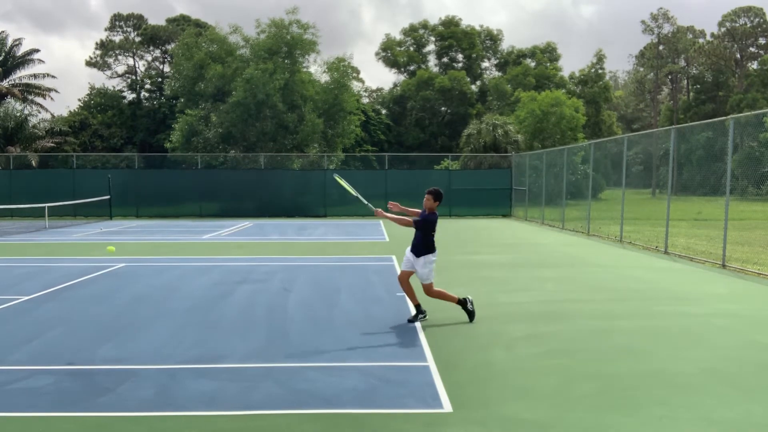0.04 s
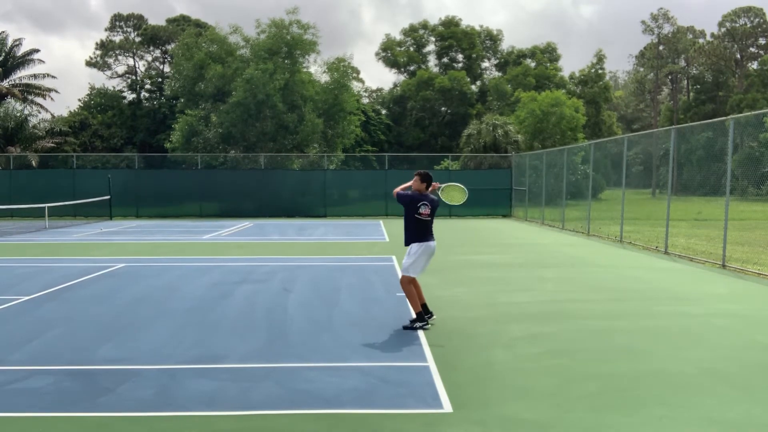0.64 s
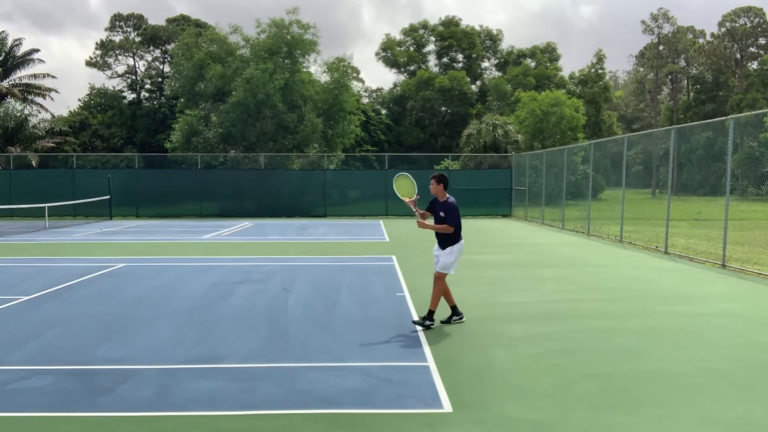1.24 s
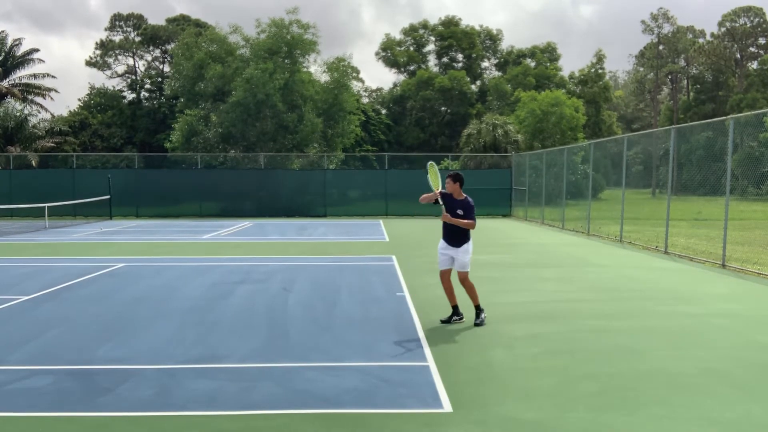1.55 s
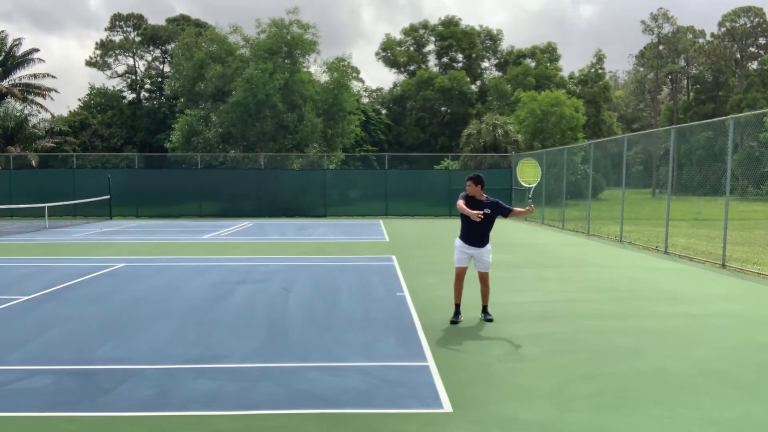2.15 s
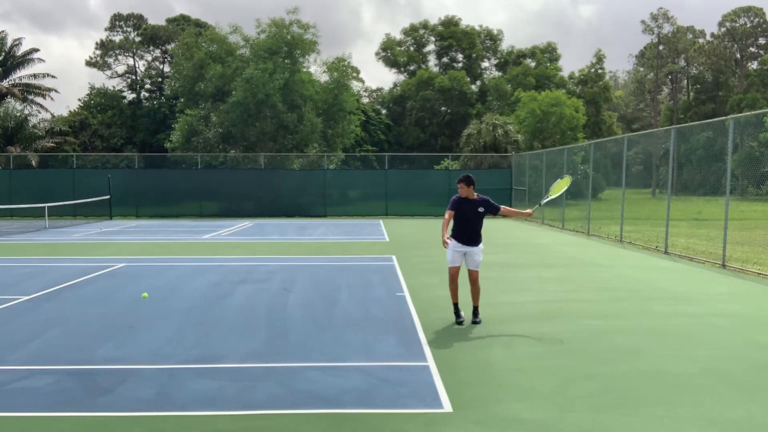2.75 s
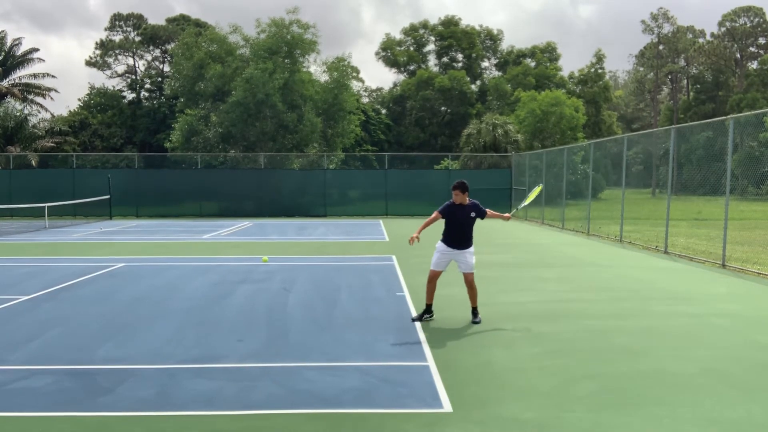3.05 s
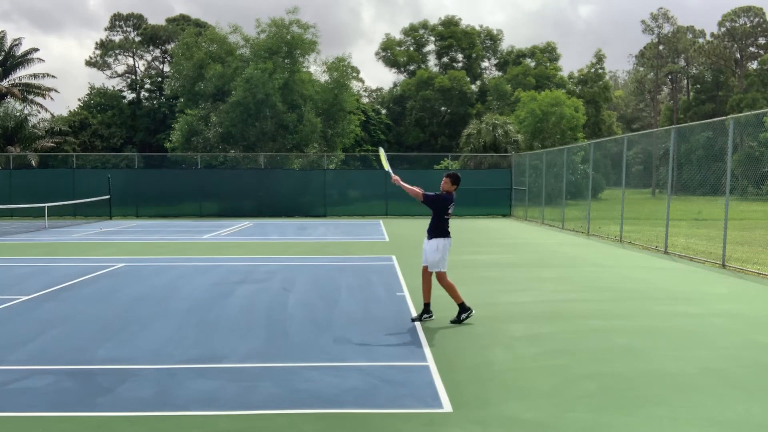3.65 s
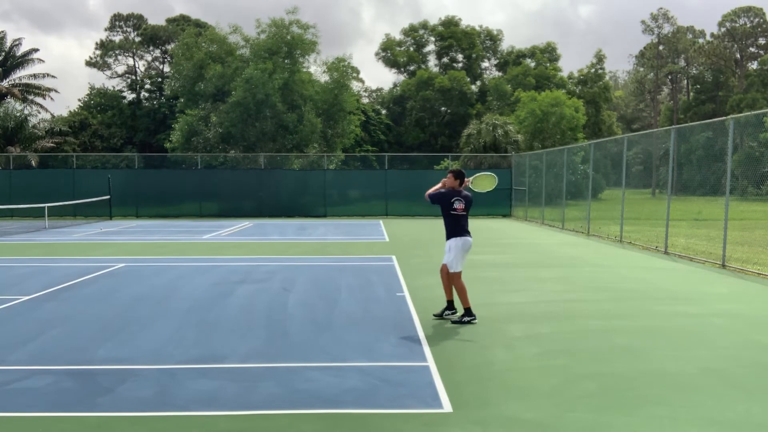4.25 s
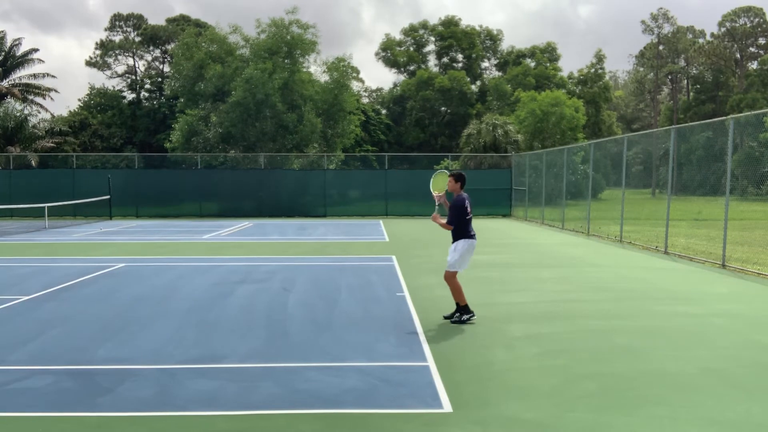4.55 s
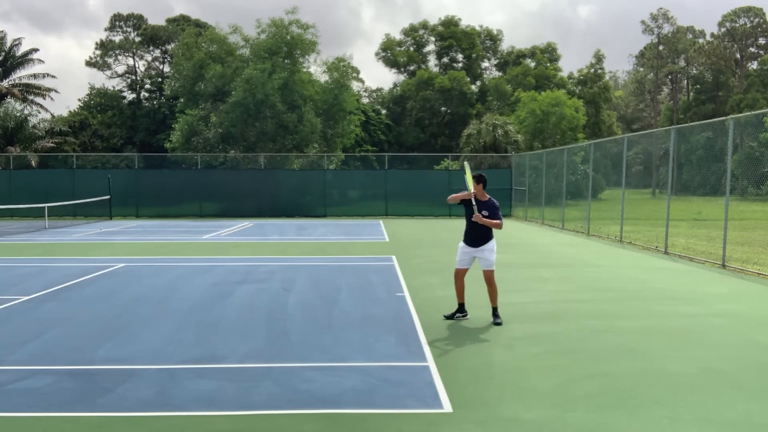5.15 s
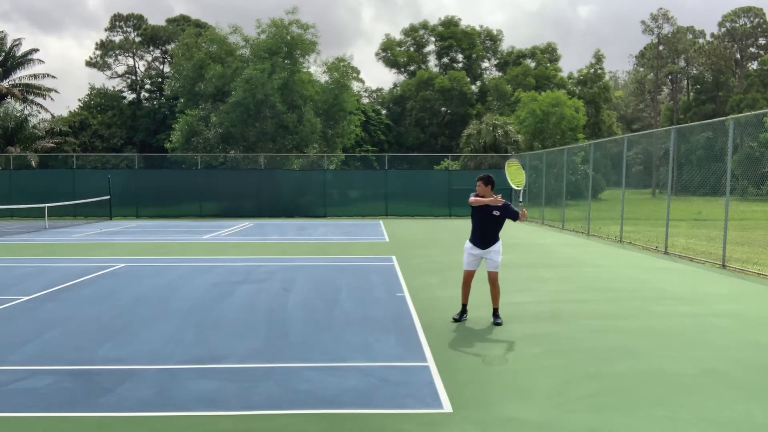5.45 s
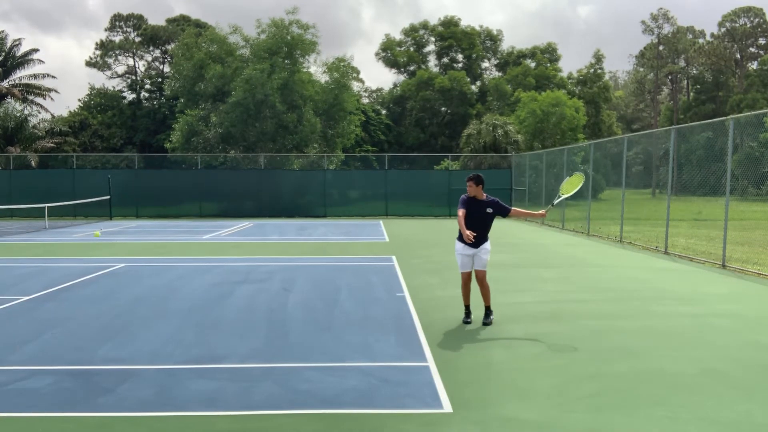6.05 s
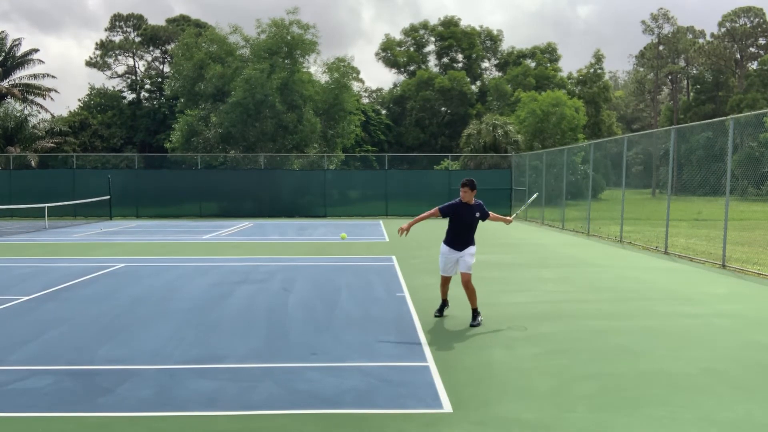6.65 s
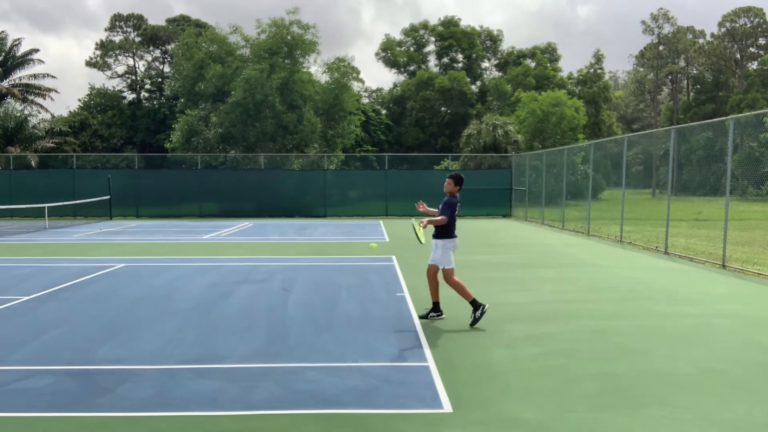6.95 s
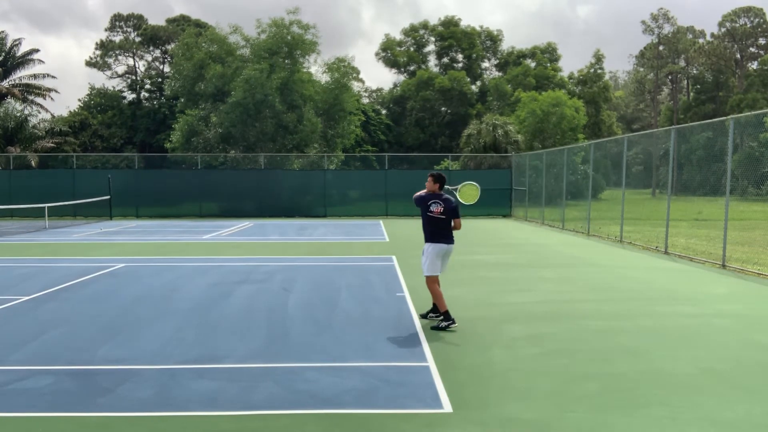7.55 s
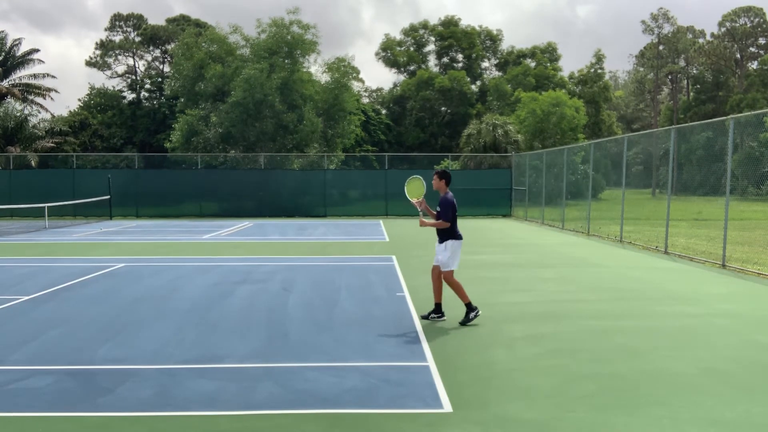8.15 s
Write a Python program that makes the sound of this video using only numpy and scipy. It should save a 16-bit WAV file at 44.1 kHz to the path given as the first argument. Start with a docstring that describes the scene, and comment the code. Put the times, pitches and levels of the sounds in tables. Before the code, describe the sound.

Two tennis strokes ring out on an open court, each a hollow pock preceded by a softer bounce. The first ends in a knock and chinking wire fence, the second in a loud smack against the net, both slightly left of the microphone. Rubber soles squeak, scrape and tap between shots. Far hollow ticks, low traffic, light rustling and a little birdsong fill the quiet background.

```python
"""A tennis racket hits two forehands on an outdoor hard court, each with the hollow pock of a squeezed ball.
Each ball bounces before the stroke; afterwards one rattles the wire fence and the other smacks the net.
Shoes tap the court, scrape over grit and squeak as their rubber sticks and slips. Fences and trees echo.
Behind it all are hollow ticks, far traffic, a thin high hiss, light rustling and one bird."""
import sys
import numpy as np
from scipy import signal
from scipy.fft import rfft, irfft, next_fast_len
from scipy.io import wavfile
from scipy.ndimage import uniform_filter1d

SR = 44100
rng = np.random.default_rng(int(sys.argv[2]) if len(sys.argv) > 2 else 0)


def put_to_file(sound):
    """Save the sound as 16-bit audio at rate SR, in the file named by the first command-line argument."""
    columns = np.atleast_2d(sound).T  # one column per channel
    safe = np.clip(columns, -1, 1)
    whole_steps = np.round(safe * 32767)
    wavfile.write(sys.argv[1], SR, whole_steps.astype(np.int16))


N = 366471
T = np.arange(N) / SR  # seconds since the scene began
EVENT_T = np.arange(-SR // 4, SR // 4) / SR  # seconds before and after one short event

# tone of a hard knock, from a ball or a shoe: pitch_hz, level_db
KNOCK_TONE = [(150, -30), (600, -7), (1200, 15.5), (2200, 6.5), (3100, 8), (4500, 3), (7000, -5),
              (11000, -46), (16000, -24)]


def from_db(db):
    """Turn decibels into a number to multiply by."""
    return 10 ** (np.asarray(db) / 20)


def unit_power(x):
    """Scale a signal so that its average power is one."""
    return x / np.sqrt(np.mean(x ** 2) + 1e-20)


def over_time(rows):
    """Join (time, value) points with straight lines, giving a value for every sample."""
    times, values = np.transpose(rows)
    return np.interp(T, times, values)


def over_pitch(rows, size):
    """Spread a table's columns over every frequency in a spectrum of `size` samples."""
    hz, *columns = np.transpose(rows)
    log_hz = np.log(np.fft.rfftfreq(size, 1 / SR) + 1)
    return [np.interp(log_hz, np.log(hz), column) for column in columns]


def shape_tone(x, tone):
    """Make each pitch louder or softer, as a table of (pitch_hz, level_db) says."""
    size = 2 * next_fast_len(x.shape[-1] // 2 + 1)
    cepstrum = irfft(np.log(from_db(over_pitch(tone, size)[0])))
    # folding onto the first half makes the filter ring after a sound, not before it
    cepstrum[1:size // 2] *= 2
    cepstrum[size // 2 + 1:] = 0
    return irfft(rfft(x, size) * np.exp(rfft(cepstrum)))[..., :x.shape[-1]]


def noise():
    """White noise for one event."""
    return rng.standard_normal(len(EVENT_T))


def noise_band(hz, width_hz):
    """Noise gathered around one pitch."""
    edges_hz = [max(hz - width_hz / 2, 20), min(hz + width_hz / 2, SR / 2 - 20)]
    band = signal.butter(1, edges_hz, "band", fs=SR, output="sos")
    return unit_power(signal.sosfilt(band, signal.sosfilt(band, noise())))


def wobble(samples):
    """A smooth random wander for one event; more samples make it slower."""
    return unit_power(uniform_filter1d(uniform_filter1d(noise(), samples), samples))


def flicker(length, depth_db, samples):
    """A gain that flickers at random; more samples make it slower."""
    return from_db(depth_db * unit_power(uniform_filter1d(rng.standard_normal(length), samples)))


def swell(rise_s, fall_s, peak_s=0):
    """A rounded rise to a peak, then a fade."""
    t = EVENT_T - peak_s
    return np.exp(-np.where(t < 0, (t / rise_s) ** 2, np.hypot(t / fall_s, .5) - .5))


def ring(hz, ring_s):
    """One note of a struck object, fading by 60 dB in ring_s seconds."""
    t = np.maximum(EVENT_T, 0)
    return np.sin(2 * np.pi * hz * t) * from_db(-60 * t / ring_s)


def click(scatter_db, fall_s):
    """One sharp contact and the scatter of noise that follows it."""
    return (EVENT_T == 0) + from_db(scatter_db) * noise() * swell(.0001, fall_s) * (EVENT_T > 0)


def place(out, sound, at_s, left_late_ms, left_louder_db):
    """Add an event to the scene, with a small gap in time and level between left and right."""
    start = round((at_s + EVENT_T[0]) * SR)
    low, high = max(start, 0), min(start + len(EVENT_T), N)
    for channel, sign in enumerate((1, -1)):
        delayed = np.roll(sound, round(max(sign * left_late_ms, 0) * SR / 1000))
        out[channel, low:high] += from_db(sign * left_louder_db / 2) * delayed[low - start:high - start]


def wide_noise(tone):
    """Steady stereo noise, partly shared by left and right and partly separate."""
    # how the two sides compare: pitch_hz, likeness (0 to 1), left_lead_radians, left_louder_db
    sides = [(90, .92, -.2, 1.6), (200, .87, -.35, 1.4), (600, .82, -2.3, -3), (950, .78, -2.8, -3),
             (1500, .4, -3.9, -1), (4200, .55, -9.3, 0), (6500, .45, -10.2, 0), (8200, .96, -9.75, 0),
             (8800, .998, -9.5, 0), (9400, .998, -9.35, 0), (11500, .93, -7.7, 0), (12500, .98, -6.3, 0)]
    size = 2 * next_fast_len(N // 2 + 1)
    likeness, lead, left_louder_db = over_pitch(sides, size)
    spectra = rfft(rng.standard_normal((3, size)))
    left, right = np.sqrt(likeness) * spectra[0] + np.sqrt(1 - likeness) * spectra[1:]
    left = left * from_db(left_louder_db / 2) * np.exp(1j * lead)
    right = right * from_db(-left_louder_db / 2)
    gain = from_db(over_pitch(tone, size)[0])
    return irfft(np.array([left, right]) * gain)[:, :N] * np.sqrt(SR / 2)


def high_hiss():
    """A thin high hiss that slowly swells and sinks."""
    # tone of the hiss: pitch_hz, level_db (per Hz)
    tone = [(3000, -125), (5500, -107), (6600, -99), (7700, -84), (9000, -82), (10000, -78.5),
            (11500, -83.5), (13000, -92.5), (15500, -106)]
    # its slow swell, counted from the middle level: time_s, level_db
    swell_points = [(0.0, -51), (0.74, -53), (1.66, -49.5), (1.94, -50), (2.66, -49.5), (3.19, -50.5),
                    (4.02, -49), (4.44, -52), (5.41, -50.5), (6.08, -49.5), (6.47, -51), (8.3, -51)]
    swell_db = over_time(swell_points)
    return from_db(swell_db - np.median(swell_db)) * wide_noise(tone)


def engine(nearest_s, db, hz, passing_s, waver_db=3.0, share_of_sound_speed=.03):
    """A far engine passes: louder when near, sinking in pitch, wavering on its way through the air."""
    along_road = (T - nearest_s) / passing_s
    distance = np.hypot(1, along_road)
    pitch_hz = hz * (1 - share_of_sound_speed * along_road / distance)
    waver_times = np.arange(0, T[-1] + 1, 0.1)
    waver = np.interp(T, waver_times, rng.standard_normal(len(waver_times)))
    hum = np.sqrt(2) * np.sin(2 * np.pi * np.cumsum(pitch_hz) / SR)
    return from_db(db + waver_db * waver) / distance * hum


def traffic():
    """A far road rumbles steadily while two engines pass, a little louder on the left."""
    # tone of the road: pitch_hz, level_db (per Hz)
    rumble = [(20, -77), (32, -88), (50, -63), (80, -59.5), (125, -61), (175, -67), (310, -75),
              (500, -71.5), (730, -68), (1000, -74.5), (1400, -88), (2000, -94.5), (4000, -104),
              (16000, -118)]
    # passing engines: nearest_s, level_db, pitch_hz, passing_s
    vehicles = [(3.899, -41.5, 103.4, 2.136), (6.3, -46, 78.56, 0.795)]
    engines = sum(engine(*vehicle) for vehicle in vehicles)
    return wide_noise(rumble) + engines * from_db([[.8], [-.8]])


def rustle(level_db):
    """A crinkly wash of many tiny contacts."""
    # tone of the contacts: pitch_hz, level_db
    tone = [(300, -3), (1200, 12), (2200, 0.5), (3500, -2.5), (6000, -5), (10000, -2), (16000, -33)]
    crinkle = flicker(N, depth_db=1.0, samples=150)
    return from_db(level_db) * unit_power(crinkle * wide_noise(tone))


def light_rustling(opening_db=-46, opening_fall_s=0.21):
    """A wash of sound from a stroke just before dies away at the start; a lighter rustle grows through the
    second half."""
    # strength of the lighter rustle: time_s, level_db
    levels = [(3.5, -70), (5.0, -62), (7.5, -57), (8.3, -62)]
    return rustle(over_time(levels)) + rustle(opening_db) * np.exp(-T / opening_fall_s)


def bird(trill_hz=35, trill_db=4.0):
    """A far bird in the trees gives a thin trill and short notes."""
    # its notes: peak_s, level_db, pitch_hz, width_hz, rise_s, fall_s
    notes = [(1.78, -60.5, 5420, 560, 0.025, 0.06), (1.89, -62, 5420, 560, 0.04, 0.07),
             (1.86, -66, 4720, 200, 0.06, 0.08), (1.797, -61, 2810, 160, 0.016, .013),
             (6.465, -62, 2900, 220, 0.025, .03)]
    out = np.zeros((2, N))
    trill = from_db(trill_db * np.sin(2 * np.pi * trill_hz * EVENT_T))
    for peak_s, db, hz, width_hz, rise_s, fall_s in notes:
        note = from_db(db) * noise_band(hz, width_hz) * trill * swell(rise_s, fall_s)
        place(out, note, peak_s, left_late_ms=0.38, left_louder_db=5.0)
    return out


def far_ticks():
    """Hollow ticks, each with its own pitch, come from the left, like a ball bouncing on the far court."""
    # ticks: start_s, peak_db, pitch_hz, width_hz, scatter_db
    ticks = [(1.236, -35.5, 2580, 2000, -34), (4.4998, -34, 4120, 700, -26),
             (4.5297, -41, 3300, 1800, -18.5), (4.6137, -26, 2290, 950, -31),
             (4.9513, -45, 3030, 1800, -13), (5.0732, -37, 2920, 1700, -35), (5.371, -27, 2710, 1410, -38),
             (5.47, -46, 2520, 700, -30), (5.619, -37.5, 2510, 1400, -30), (5.722, -43.5, 2580, 900, -31)]
    out = np.zeros((2, N))
    for start_s, db, hz, width_hz, scatter_db in ticks:
        body = signal.butter(3, [hz - width_hz / 2, hz + width_hz / 2], "band", fs=SR, output="sos")
        contact = click(scatter_db, fall_s=0.0097) + 1e-18  # the tiny offset keeps the filter fast
        tick = signal.sosfilt(body, contact)
        place(out, from_db(db) * tick / abs(tick).max(), start_s, left_late_ms=-0.36, left_louder_db=4.5)
    return out


def court_echo(sound, tail_db=-22, ring_s=0.58, build_s=.008):
    """A few clear echoes, and a thin tail scattered unevenly by posts and branches."""
    # echoes from the fence and windscreens: delay_s, level_db
    echoes = [(0.0102, -19), (0.0198, -32), (0.049, -74), (0.089, -67)]
    # tone of the tail: pitch_hz, level_db
    tail_tone = [(100, -4), (300, 1), (1100, -4.5), (1900, 5.5), (2600, 6), (4500, 7), (9000, -11),
                 (16000, -17)]
    t = T[:SR]
    patchiness = unit_power(flicker(SR, depth_db=3.5, samples=90))
    scatter = shape_tone(patchiness * rng.standard_normal((2, SR)), tail_tone)
    envelope = from_db(-60 * t / ring_s) * (1 - np.exp(-t / build_s))
    fade_energy = SR * ring_s / np.log(1e6)
    response = from_db(tail_db) * scatter * envelope / np.sqrt(fade_energy)
    for delay_s, db in echoes:
        response[:, round(delay_s * SR)] += from_db(db)
    return signal.fftconvolve(sound, response, axes=1)[:, :N]


def footsteps(boost_db=18):
    """Shoes tap lightly on the hard court."""
    # footfalls: start_s, level_db (before the boost)
    steps = [(0.905, -53.5), (6.2984, -46), (7.054, -49), (7.6291, -43), (7.877, -46)]
    out = np.zeros((2, N))
    for start_s, db in steps:
        tap = shape_tone(click(scatter_db=-27, fall_s=0.016), KNOCK_TONE)
        place(out, from_db(db + boost_db) * tap, start_s, left_late_ms=0.29, left_louder_db=2.0)
    return out


def shoe_scuffs():
    """Soles grind over uneven grains of grit."""
    # slides of a sole: peak_s, level_db, fall_s, top_hz, left_late_ms
    scuffs = [(0.359, -37.5, 0.021, 17000, .07), (0.391, -34.5, 0.0097, 5800, .07),
              (1.802, -58.5, 0.079, 7500, .15), (2.736, -53, 0.016, 7000, .12),
              (3.668, -50.5, 0.022, 3800, .065), (4.347, -51, 0.017, 4200, .065),
              (5.326, -58, 0.052, 4400, .065), (5.972, -55.5, 0.053, 4430, .065),
              (6.816, -52, 0.01, 5000, .07), (7.131, -31.5, 0.012, 17000, .085),
              (7.156, -39, 0.012, 6200, .075), (8.082, -60, 0.018, 6500, .07)]
    # tone of the grit: pitch_hz, level_db
    grit_tone = [(300, -18), (1600, -9), (3000, 3.5), (4000, 2), (4900, 5), (5900, -3), (6700, -1),
                 (8200, .5), (9200, -6), (11000, 2.5), (13500, 1.5), (15500, -2)]
    out = np.zeros((2, N))
    for peak_s, db, fall_s, top_hz, left_late_ms in scuffs:
        grains = flicker(len(EVENT_T), depth_db=3.5, samples=40)
        treble_cut = signal.butter(2, top_hz, fs=SR, output="sos")
        grit = signal.sosfilt(treble_cut, shape_tone(noise() * grains, grit_tone))
        scuff = from_db(db) * unit_power(grit) * swell(0.98 * fall_s, fall_s)
        place(out, scuff, peak_s, left_late_ms, left_louder_db=-0.5)
    return out


def shoe_squeaks(sink_hz_per_s=12000, grip_db=4.0, rasp_db=-15, echo_s=0.022, echo_db=-19.5):
    """Rubber sticks and slips, giving a wobbling squeak that sinks in pitch as the foot slows."""
    # grabs of a sole: peak_s, level_db, pitch_hz, wobble_hz, rise_s, overtone_db
    grabs = [(0.374, -34, 3120, 221, 0.005, -27), (0.384, -25, 2720, 90, 0.0038, -27),
             (0.396, -29, 2577, 80, 0.0057, -12), (2.715, -48, 2370, 90, 0.004, -23),
             (2.7244, -33.5, 2140, 49.7, 0.0047, -21), (2.737, -39, 2060, 70, 0.0075, -13),
             (6.814, -34, 2010, 70, 0.0052, -26), (6.821, -37, 2000, 80, .0042, -15),
             (7.134, -36.5, 2904, 200, 0.004, -20), (7.695, -48, 1800, 260, 0.012, -17)]
    out = np.zeros((2, N))
    for peak_s, db, hz, wobble_hz, rise_s, overtone_db in grabs:
        pitch_hz = hz - sink_hz_per_s * EVENT_T + wobble_hz * wobble(samples=50)
        phase = 2 * np.pi * np.cumsum(pitch_hz) / SR
        overtones = from_db(overtone_db) * (np.cos(2 * phase) + from_db(-3) * np.cos(3 * phase))
        tone = from_db(grip_db * wobble(samples=70)) * (np.cos(phase) + overtones)
        rasp = from_db(rasp_db) * noise_band(1.09 * hz, width_hz=hz)
        pressure = np.exp(-(EVENT_T / np.where(EVENT_T < 0, rise_s, 1.55 * rise_s)) ** 2)
        squeak = from_db(db) * (unit_power(tone) + rasp) * pressure
        fence_echo = from_db(echo_db) * np.roll(squeak, round(echo_s * SR))
        place(out, squeak + fence_echo, peak_s, left_late_ms=.068, left_louder_db=-0.5)
    return out


def fence_rattle(hit_s=4.46, fall_s=0.4, chinks_per_s=260, chink_db=-46, shiver_db=-49,
                 crash_db=-34, crash_rise_s=.002, crash_fall_s=0.0047):
    """The wire mesh crashes and clangs as the ball hits, then its wires chink over a faint shiver."""
    # notes of wires touching each other: pitch_hz, level_db, ring_s
    chink_notes = [(1650, 5, .011), (2010, 0, 0.0089), (2280, 0.5, 0.009), (2730, -8, 0.009),
                   (3300, -9, 0.0078), (3780, -4, 0.011), (5600, -17, .005)]
    # notes of the wires the ball strikes: pitch_hz, level_db, ring_s
    clang_notes = [(2240, -37.5, .055), (3410, -39, .05), (3720, -34, 0.06), (5550, -42, .06),
                   (6250, -40, 0.055)]
    since = np.maximum(T - hit_s, 0)
    shaking = (since > 0) * np.exp(-since / fall_s)
    touches = (rng.random(N) < chinks_per_s / SR) * shaking
    chinks = np.zeros(N)
    for hz, db, ring_s in chink_notes:
        strengths = touches * rng.laplace(0, .5, N)
        chinks += signal.fftconvolve(strengths, from_db(db) * ring(hz, ring_s), "same")
    crash_envelope = np.minimum(since / crash_rise_s, 1) * np.exp(-since / crash_fall_s)
    crash = from_db(crash_db) * rng.laplace(0, 1, N) * crash_envelope
    clang = sum(np.sin(2 * np.pi * hz * since) * from_db(db - 60 * since / ring_s)
                for hz, db, ring_s in clang_notes)
    left = crash + clang + from_db(chink_db) * chinks
    right = np.roll(left, round(.00036 * SR))  # the right side hears it a moment later
    return np.array([left, right]) + shaking * rustle(shiver_db)


def ball_knocks(thud_delay_s=0.0016):
    """The first ball hits the fence, the second smacks the net, and each rebounds once."""
    # impacts: start_s, click_db, thud_db, ball_ring_db, rebound_after_s, rebound_db, ground_echo_ms
    impacts = [(4.4598, -12.5, -31, -27, .007, -9.5, 0.16), (7.367, -2.5, -18, -29, 0.0315, -13.5, .61)]
    out = np.zeros((2, N))
    for start_s, click_db, thud_db, ball_db, rebound_s, rebound_db, echo_ms in impacts:
        thud = from_db(thud_db) * np.roll(ring(hz=290, ring_s=0.021), round(thud_delay_s * SR))
        shell = from_db(ball_db) * ring(hz=1000, ring_s=0.046)
        for delay_s, db in ((0, 0), (rebound_s, rebound_db)):
            crack = from_db(click_db) * shape_tone(click(scatter_db=-31, fall_s=0.0081), KNOCK_TONE)
            ground_echo = .8 * np.roll(crack, round(echo_ms * SR / 1000))  # makes the knock hollow
            knock = from_db(db) * (crack + ground_echo + thud + shell)
            place(out, knock, start_s + delay_s, left_late_ms=-.32, left_louder_db=3.0)
    return out


def ball_bounces(slap_db=-3, thud_db=-5):
    """Before each stroke the ball slaps the court and its shell rings briefly."""
    # landings: start_s, level_db, pitch_hz
    landings = [(2.8460, -29, 1260), (6.3158, -27.5, 1230)]
    # tone of felt slapping the court: pitch_hz, level_db
    slap_tone = [(200, 3), (1200, 21), (2000, 3), (3000, 0.5), (4400, -3), (6000, -37), (16000, -43)]
    out = np.zeros((2, N))
    for start_s, db, hz in landings:
        slap = from_db(slap_db) * unit_power(shape_tone(noise(), slap_tone))
        slap *= swell(rise_s=0.00061, fall_s=0.00027)
        thud = from_db(thud_db) * ring(hz=260, ring_s=0.07)
        shell = ring(hz, ring_s=0.024)
        place(out, from_db(db) * (shell + thud + slap), start_s, left_late_ms=-.03, left_louder_db=2.0)
    return out


def racket_ring(off_centre, choke_s=.016):
    """Strings and frame ring until hand and damper choke them; the spot hit sets the mix of notes."""
    # notes of the racket: pitch_hz, centre_hit_db, edge_hit_db, ring_s
    notes = [(510, -30, -28.5, 0.14), (754, -15, -6, 0.039), (980, -46, -10, 0.051),
             (1230, -13, -59, 0.036), (1800, -18, -35, 0.083), (2200, -20, -50, .04),
             (2440, -23.5, -23, 0.033), (2600, -38, -14, 0.019), (3430, -41, -32, 0.026),
             (4120, -35, -48, .03), (4300, -36, -34, .03), (5070, -54, -26, 0.033), (7100, -60, -22, 0.021)]
    choke = np.exp(-(EVENT_T / choke_s) ** 2)
    return choke * sum(from_db(np.interp(off_centre, [0, 1], [centre_db, edge_db])) * ring(hz, ring_s)
                       for hz, centre_db, edge_db, ring_s in notes)


def forehands(contact_s=0.0051, bite_rise_s=0.0009, bite_peak_s=.0014, pock_fall_s=0.001,
              pitch_sag=0.023, thump_delay_s=0.00042, thump_width_s=0.0021):
    """Felt bites the strings, the squeezed ball pocks, the strings shove air and the racket rings."""
    # strokes: deepest_squeeze_s, pock_db, ball_hz, squeeze_s, thump_hz, thump_db, bite_db,
    # bite_fall_s, snap_db, off_centre (0 to 1), left_louder_db
    strokes = [(3.5253, 0.5, 1100, 0.00078, 290, -7.5, -21.5, 0.0012, -29, 0.13, 0),
               (6.9680, -3, 950, 0.0027, 250, -11, -20, 0.0016, -32.5, 0.76, -1)]
    # tone of felt biting into the strings: pitch_hz, level_db
    bite_tone = [(200, -15), (800, -2), (1300, 7), (1900, 7), (2600, 3), (3400, 4), (4400, 5.5), (6000, -3),
                 (7600, 2), (9200, -7), (11000, -5), (14000, -8), (16000, -15)]
    # tone of strings rubbing on each other: pitch_hz, level_db
    snap_tone = [(600, -15), (1600, -3), (2400, 2), (3400, 0), (4600, -1), (5600, -16), (16000, -28)]
    out = np.zeros((2, N))
    # the ball first touches the strings contact_s before its deepest squeeze
    touching = np.clip((EVENT_T + contact_s) / bite_rise_s, 0, 1)
    thump_t = EVENT_T - thump_delay_s
    thump_envelope = np.exp(-(thump_t / thump_width_s) ** 2)
    for (at_s, pock_db, ball_hz, squeeze_s, thump_hz, thump_db, bite_db,
         bite_fall_s, snap_db, off_centre, left_louder_db) in strokes:
        bite = from_db(bite_db) * unit_power(shape_tone(noise(), bite_tone))
        bite *= swell(bite_rise_s, bite_fall_s, peak_s=bite_peak_s - contact_s)
        # the pock builds up to the deepest squeeze; its pitch sags as the ball relaxes
        pressure = touching * np.exp(-abs(EVENT_T) / np.where(EVENT_T < 0, squeeze_s, pock_fall_s))
        cycles = ball_hz * EVENT_T
        pock = -from_db(pock_db) * np.cos(2 * np.pi * (cycles - pitch_sag * cycles ** 2)) * pressure
        thump = from_db(thump_db) * np.sin(2 * np.pi * thump_hz * thump_t) * thump_envelope
        # strings pushed aside by the spin rub back into place
        snap = from_db(snap_db) * unit_power(shape_tone(noise(), snap_tone))
        snap *= swell(rise_s=0.00076, fall_s=0.01)
        stroke = bite + pock + thump + racket_ring(off_centre) + snap
        place(out, stroke, at_s, left_late_ms=.085, left_louder_db=left_louder_db)
    return out


def scene(slide_echo_db=-5):
    """Strokes, ball and footwork echo around the open court, over the background."""
    hits = forehands() + ball_bounces() + ball_knocks() + footsteps() + far_ticks() + fence_rattle()
    slides = shoe_scuffs() + shoe_squeaks()
    # scuffs and squeaks, made down at the ground, reach the fences more weakly
    echo = court_echo(hits + from_db(slide_echo_db) * slides)
    background = bird() + light_rustling() + high_hiss() + traffic()
    return hits + slides + echo + background


def record(dry, cutoff_hz=15800):
    """Round off the loudest peaks and cut the highest treble."""
    rounded = dry / (1 + dry ** 8) ** (1 / 8)
    treble_cut = signal.ellip(12, .1, 80, cutoff_hz, fs=SR, output="sos")
    return signal.sosfilt(treble_cut, rounded)


dry = scene()
out = record(dry)
put_to_file(out)
```